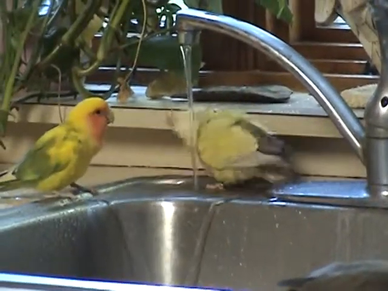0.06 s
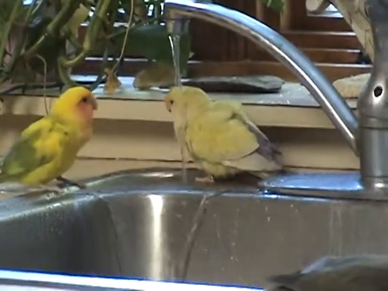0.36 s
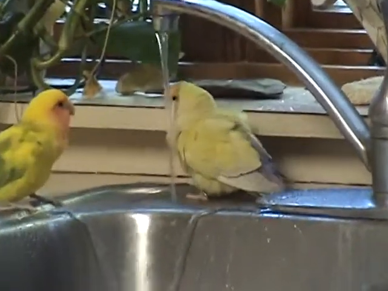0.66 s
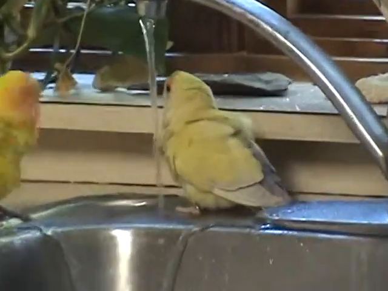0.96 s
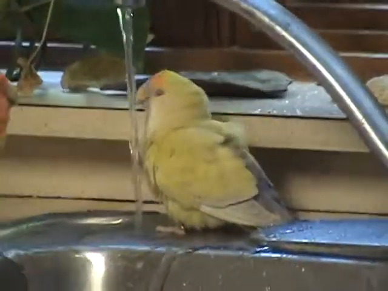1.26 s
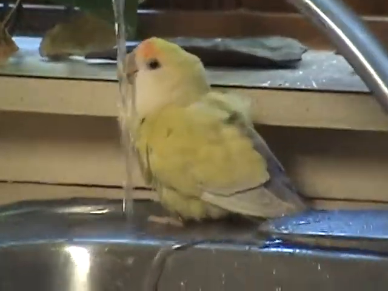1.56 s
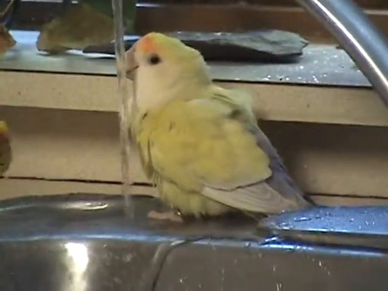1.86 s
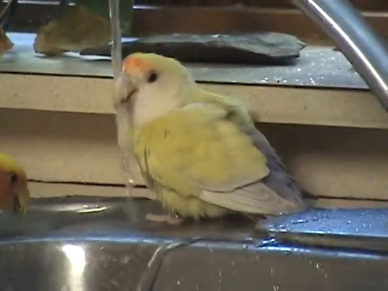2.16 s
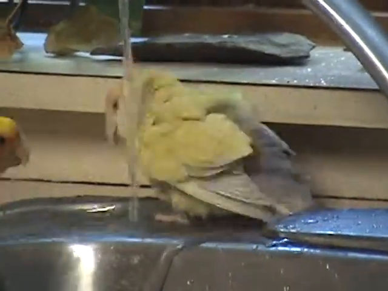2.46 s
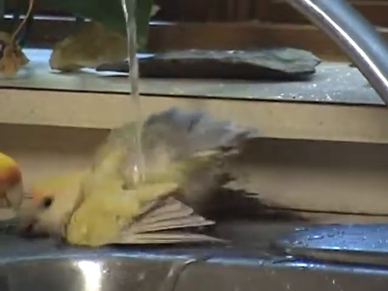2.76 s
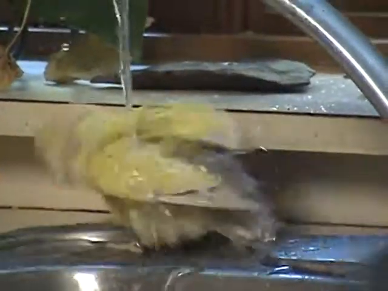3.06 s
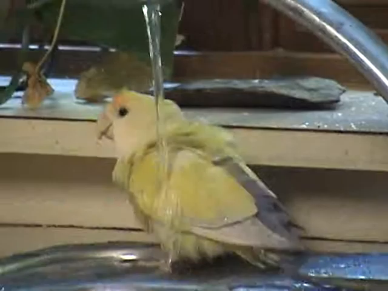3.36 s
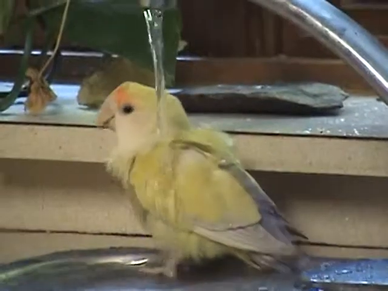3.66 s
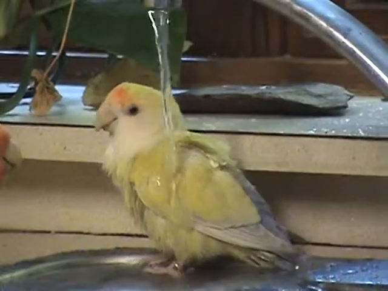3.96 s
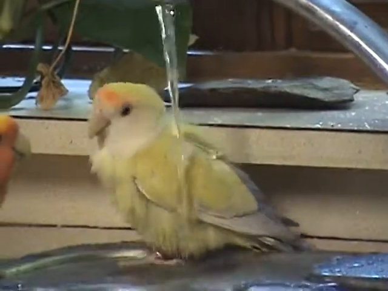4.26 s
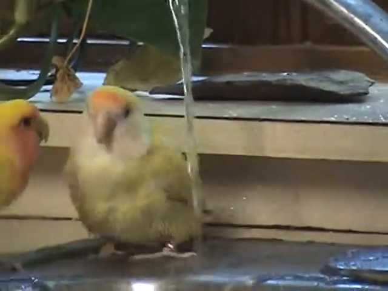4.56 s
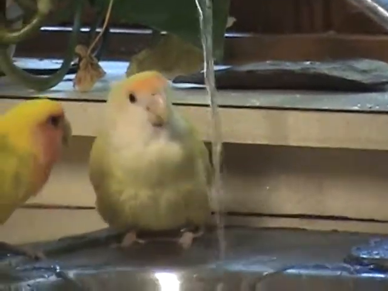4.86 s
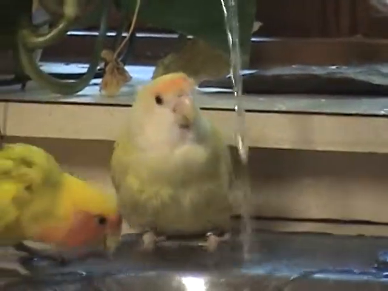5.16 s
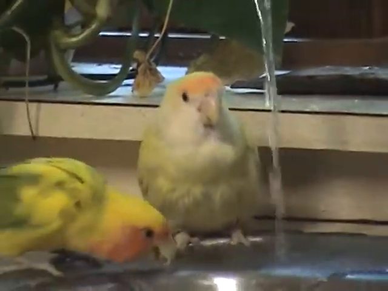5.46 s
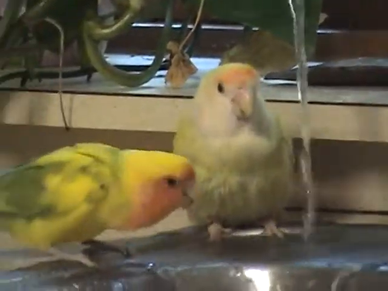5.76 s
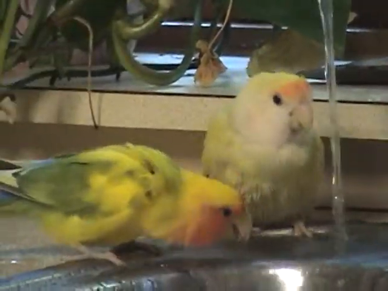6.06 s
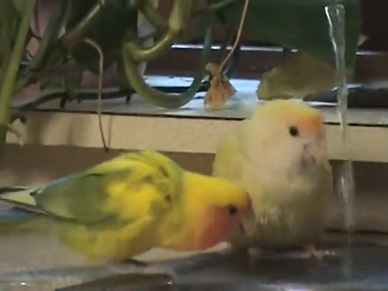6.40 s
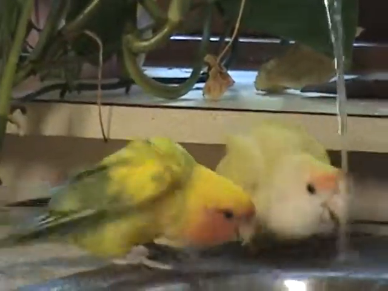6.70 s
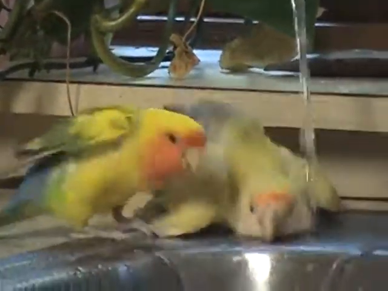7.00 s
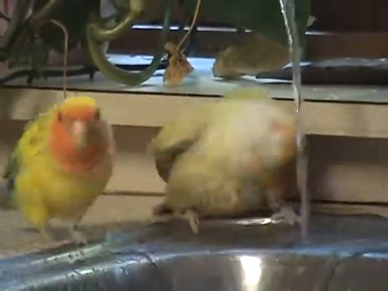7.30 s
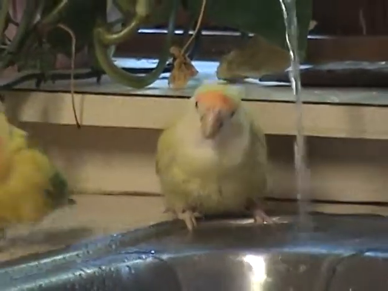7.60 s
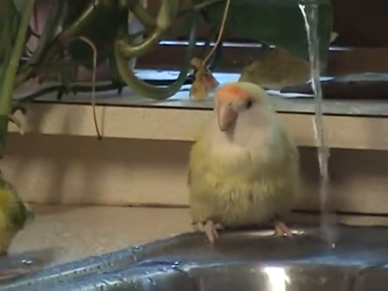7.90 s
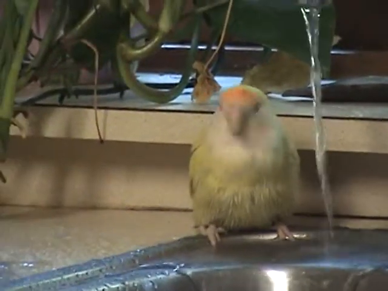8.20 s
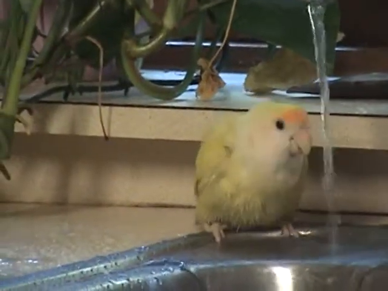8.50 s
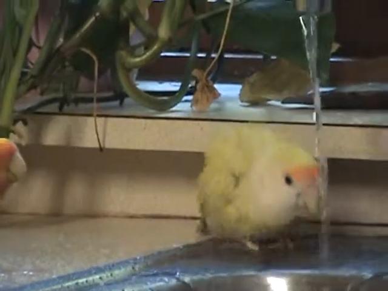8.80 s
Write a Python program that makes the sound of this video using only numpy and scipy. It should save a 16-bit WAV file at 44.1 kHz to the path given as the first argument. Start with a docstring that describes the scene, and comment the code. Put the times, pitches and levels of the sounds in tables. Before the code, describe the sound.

Small parrots bathe at a kitchen sink, heard from nearby. Their piercing, raspy squawks come from the left in quick clusters with a short room echo: three early on, then a pause of about four seconds, then a last one. Much quieter, the tap water spatters throughout with a thin whistle over a low hum, joined by bouts of wet feather shaking, light ticks and tiny claw scrapes on metal.

```python
"""Lovebirds squawk on the left as they bathe under a kitchen tap. Each squawk is a quick run of
buzzes, shrieks and pips from the bird's voice organ; it rings through the room and pushes the
recorder's gain down. Wet wings flutter and throw drops, and beaks, drops and claws tick and scrape
on the steel sink. Behind them a thin stream patters, the valve whistles and a motor hums."""
import sys
import numpy as np
from scipy import signal
from scipy.fft import rfft, irfft, next_fast_len
from scipy.io import wavfile
from scipy.ndimage import uniform_filter1d

SR = 44100
rng = np.random.default_rng(int(sys.argv[2]) if len(sys.argv) > 2 else 0)


def waveform_to_disk(signal):
    """Save audio, clipped to [-1, 1], as 16-bit WAV at the path in sys.argv[1]."""
    frames = np.transpose(np.atleast_2d(signal))
    scaled = np.clip(frames, -1, 1) * 32767
    samples = np.round(scaled).astype(np.int16)
    wavfile.write(sys.argv[1], SR, samples)


N = 394254
TIME = np.arange(N) / SR


def from_db(db):
    """Turn decibels into a number to multiply by."""
    return 10 ** (np.asarray(db) / 20)


def unit_power(x):
    """Scale a signal so that its average power is 1."""
    return x / np.sqrt(np.mean(x ** 2) + 1e-20)


def at_hz(points, hz):
    """Read between the rows of a (frequency, value) table, giving each octave equal room."""
    freqs, values = np.transpose(points)
    return np.interp(np.log(hz), np.log(freqs), values)


def drift(rate_hz, size=N):
    """A smooth random wobble, typically about 1 away from zero."""
    knots = rng.standard_normal(size // 8 + 4)
    position = np.arange(size) * min(2 * rate_hz / SR, 1 / 8)
    return np.interp(position, np.arange(len(knots)), knots) * np.sqrt(3 / 2)


def envelope(t, length, attack_s, release_s):
    """Fade in from t = 0, hold until length, then fade out."""
    return np.clip(t / attack_s, 0, 1) * np.clip(1 + (length - t) / release_s, 0, 1)


def pan(lean_db):
    """Left and right gains; a positive lean makes the left side louder."""
    gains = from_db(np.array([lean_db, -lean_db]).reshape(2, -1) / 2)
    return gains / gains.mean(axis=0)


def pair(mid, side, alike):
    """Mix two unrelated signals into left and right, from unrelated (0) to the same (1)."""
    alike = np.clip(alike, 0, 1)
    return mid + np.sqrt((1 - alike) / (1 + alike)) * side * [[1], [-1]]


def bands(size=N):
    """Give the centre frequency and two unrelated noises for each band, from bass to treble."""
    edges_hz = np.geomspace(22, 17000, 23)
    white = rng.standard_normal((2, 2, size))
    for k, (low, high) in enumerate(zip(edges_hz, edges_hz[1:])):
        band = signal.butter(2, [low, high], "band", fs=SR, output="sos")
        yield np.sqrt(low * high), signal.sosfilt(band, white[k % 2])


def resonate(x, hz, width):
    """A resonance lets through the sound near one frequency and weakens the rest."""
    r = np.exp(-np.pi * width / SR)
    feedback = [1, -2 * r * np.cos(2 * np.pi * hz / SR), r * r]
    return signal.lfilter(np.array([1, 0, -1]) * (1 - r * r) / 2, feedback, x + 1e-18)


def ring(clicks, hz, fade_s):
    """Each click starts a pure tone that dies away by 60 dB in fade_s."""
    r, step = from_db(-60 / (fade_s * SR)), 2 * np.pi * hz / SR
    return signal.lfilter([0, np.sin(step)], [1, -2 * r * np.cos(step), r * r], clicks + 1e-18)


def sink_noise(spectrum, flicker_db, flicker_hz):
    """Stereo rushing noise from the sink, each band flickering on its own."""
    # where the noise sits: (frequency [Hz], left over right [dB])
    lean = [(60, 3), (130, -8), (290, 6), (640, 4), (1410, 9), (3100, 20.5), (6820, 10.5), (15000, 4)]
    # how alike the two sides are: (frequency [Hz], likeness [0-1])
    likeness = [(30, 0.99), (150, 0.69), (500, 0.17), (1500, 0.48), (5000, 0.35), (15000, 0.45)]
    out = 0
    for hz, noise in bands():
        gain = from_db(at_hz(spectrum, hz) + flicker_db * drift(flicker_hz))
        out += gain * pan(at_hz(lean, hz)) * pair(*noise, at_hz(likeness, hz))
    return unit_power(out)


def spray(per_s, cycles=1.8):
    """Droplets of mixed sizes burst at random, each ringing very briefly at one of 16 pitches."""
    sizes = from_db(-2.0 * np.minimum(rng.exponential(1, N), 4))
    clicks = sizes * rng.choice([-1, 1], N) * (rng.random(N) < per_s / SR)
    pitches, choice = np.geomspace(2500, 12000, 16), rng.integers(0, 16, N)
    return unit_power(sum(ring(clicks * (choice == k), hz, cycles / hz) for k, hz in enumerate(pitches)))


def kitchen(x, echo_db, alike, build_s):
    """Add dense echoes from the walls, which build up and then die faster in the treble."""
    # how long the room rings: (frequency [Hz], time to fade by 60 dB [s])
    ring_times = [(300, 0.67), (2000, 0.45), (3700, 0.44), (6500, 0.48), (15000, 0.31)]
    t = TIME[:SR * 3 // 4]
    tail = sum(pair(*noise, alike) * 1000 ** (-t / at_hz(ring_times, hz)) for hz, noise in bands(len(t)))
    tail *= 1 - np.exp(-(t / build_s) ** 2)
    tail /= np.sqrt(np.sum(tail ** 2) / 2)
    return x + from_db(echo_db) * signal.fftconvolve(x, tail, axes=1)[:, :N]


def microphones(x):
    """The two microphone openings hear each frequency slightly out of step."""
    # how far the left side is ahead: (frequency [Hz], phase lead [radians])
    left_lead = [(200, 0.75), (700, 1.1), (1400, 2.1), (3000, 0.091), (5500, -0.0072), (9000, -0.88),
                 (14000, 0)]
    size = next_fast_len(N + SR // 10, real=True)
    lead = at_hz(left_lead, np.linspace(1, SR / 2, size // 2 + 1))
    return irfft(rfft(x, size) * np.exp(0.5j * lead * np.array([[1], [-1]])), size)[:, :N]


def motor_hum():
    """A motor hums somewhere in the kitchen, wavering slightly in pitch and level."""
    # the motor's tones: (frequency [Hz], level [dB])
    tones = [(188.4, -51.5), (565.2, -58.5)]
    speed = 1 + 0.00536 * drift(7.3)
    clock = np.cumsum(speed) / SR
    return sum(from_db(db + 0.23 * drift(5.1)) * np.sqrt(2) * np.sin(2 * np.pi * hz * clock)
               for hz, db in tones)


def running_tap():
    """The stream drums on the basin and spatters; the flow keeps the valve whistling."""
    # tone colour of the stream: (frequency [Hz], relative level [dB])
    water_colour = [(25, -11), (60, -4.5), (130, -3), (200, -1), (340, -10.5), (480, -7), (700, -5.5),
                    (1400, -12.5), (3300, -22), (4800, -14), (6200, -22.5), (9000, -17.5), (12500, -45),
                    (16000, -17.5)]
    # ringing notes of the steel basin: (frequency [Hz], width [Hz], level [dB])
    basin_notes = [(236.4, 9.6, -55.5), (266.7, 3.5, -58), (300, 9.9, -59.5), (342.3, 25, -53),
                   (386, 40, -58.5), (600, 83, -67.5)]
    # whistles of the valve: (frequency [Hz], base width [Hz], level [dB])
    whistles = [(2905, 66, -71), (4510, 8.2, -62.5), (5561, 94, -42.5), (5370, 210, -54), (6110, 12, -62),
                (10340, 180, -65), (15020, 90, -86)]
    stream = from_db(-46.0) * sink_noise(water_colour, flicker_db=2.0, flicker_hz=16)
    basin = valve = 0
    for hz, width, db in basin_notes:
        drumming = pair(*rng.standard_normal((2, N)), alike=0.75)
        basin += from_db(db) * unit_power(resonate(drumming, hz, width))
    spatter = from_db(-56.5 + 0.86 * drift(5)) * spray(per_s=900) * pan(2.2)
    for hz, width, db in whistles:
        flow = pair(*rng.standard_normal((2, N)), alike=0.42)
        whistle = resonate(resonate(flow, hz, 1.4 * width), hz, 1.4 * width)
        valve += from_db(db) * unit_power(whistle)
    return stream + basin + spatter + valve * pan(9.1)


def claw_scrapes(fade_s=0.0026):
    """A sliding claw rubs the steel rim, which barely rings."""
    # each slide of a claw: (time [s], length [s], level [dB])
    slides = [(2.848, 0.0025, -37), (5.294, 0.017, -38.5), (8.488, 0.011, -43)]
    # resonances of the rim: (frequency [Hz], base width [Hz], relative gain [dB])
    rim_notes = [(2370, 2200, -2), (2850, 210, 2), (3140, 360, 3), (3900, 760, -22)]
    pressure = sum(from_db(db) * (TIME > s) * np.exp(-np.clip((TIME - s - length) / fade_s, 0, 20))
                   for s, length, db in slides)
    friction = rng.standard_normal(N) * from_db(3.1 * drift(300))
    rim = sum(from_db(db) * resonate(resonate(friction, hz, width), hz, 2 * width)
              for hz, width, db in rim_notes)
    return pressure * unit_power(rim)


def steel_ticks(bright_hz=6000, crack_db=15, fade_s=0.004):
    """Drops and beaks hit the steel: a crack and a brief splatter, each with its own brightness."""
    # each hit: (time [s], level [dB], treble boost at bright_hz [dB])
    hits = [(1.0524, -37.5, 12), (2.6367, -36.5, -6), (2.8514, -28, 2.5), (3.0132, -44, 3),
            (3.175, -39.5, 7.5), (4.677, -47, 5), (4.7284, -39, 1), (5.3297, -33, 3), (5.5087, -39.5, 7),
            (5.7737, -35.5, 1.5), (6.45, -39.5, 2), (6.5676, -40.5, 5), (6.747, -50, 10), (6.8906, -46, 8),
            (7.262, -37, 7), (7.4487, -34.5, 7), (8.525, -38.5, 9), (8.7241, -35.5, 4.5)]
    # tone colour of a hit: (frequency [Hz], relative level [dB])
    hit_colour = [(300, -17), (900, 8.5), (2000, 5), (3200, 1.5), (5000, 6.5), (8000, 1), (12000, -9.5),
                  (16000, -39)]
    t, out = TIME[:SR // 16], np.zeros(N + SR)
    hz = np.linspace(1, SR / 2, len(t) // 2 + 1)
    crack = from_db(crack_db) * (np.arange(len(t)) == 24)   # a one-sample spike
    for s, level_db, treble_db in hits:
        colour = unit_power(from_db(at_hz(hit_colour, hz) + treble_db * np.minimum(hz / bright_hz, 2)))
        splatter = rng.standard_normal(len(t)) * np.exp(-t / fade_s)
        tick = irfft(rfft(crack + splatter) * colour, len(t))
        out[int(s * SR):int(s * SR) + len(t)] += from_db(level_db) * tick
    return out[:N]


def wet_wings(wingbeat_hz=28, slap_s=0.027):
    """Each wingbeat swishes wet feathers and flings off droplets; single strokes slap."""
    # bouts of wing shaking: (time [s], length [s], feather swish [dB], flung drops [dB])
    bouts = [(0, 0.036, -50, -48), (2.484, 0.58, -70, -58), (4.63, 0.13, -50, -57),
             (6.464, 0.43, -55.5, -56.5), (7.168, 0.57, -55, -54), (8.322, .61, -47, -51)]
    # single strokes and wet slaps: (time [s], level [dB])
    slaps = [(1.063, -41.5), (2.205, -40), (2.515, -45), (3.65, -37), (4.02, -43.5), (4.131, -38.5),
             (4.28, -45.5), (7.205, -41), (8.53, -40), (8.58, -58)]
    # tone colour of the feathers: (frequency [Hz], relative level [dB])
    wing_colour = [(80, -12), (250, -32), (700, -12), (1150, -7.5), (1700, -12.5), (4000, -18),
                   (15000, -55)]
    swish = drops = 0
    for s, length, swish_db, drops_db in bouts:
        shaking = envelope(TIME - s, length, attack_s=0.057, release_s=0.027)
        swish += from_db(swish_db) * shaking
        drops += from_db(drops_db) * shaking
    beat_hz = wingbeat_hz * (1 + 0.217 * drift(20))
    beat = from_db(1.9 * np.sin(2 * np.pi * np.cumsum(beat_hz) / SR))
    strokes = sum(from_db(db) * np.exp(-np.minimum(abs(TIME - s) / slap_s, 20)) for s, db in slaps)
    feathers = (swish * beat + strokes) * sink_noise(wing_colour, flicker_db=2.5, flicker_hz=33.95)
    return feathers + drops * beat * spray(per_s=1000) * pan(6.9)


def bird_note(start, length, first_hz, last_hz, level_db, rough, bright_db, others_db=0,
              lock=1, bend=1, attack_s=0.004):
    """The voice organ buzzes and rasps; it can lock on every 2nd or 3rd harmonic as the others fade."""
    # how the throat and beak colour the voice: (frequency [Hz], gain [dB])
    throat = [(1400, -14), (1800, -2), (2400, 0), (3000, 5.5), (3600, 3), (4600, 3), (5800, 3), (7200, -4),
              (8500, -9.5), (10000, -13.5), (12000, -26), (13400, -21.5), (14500, -66)]
    first, size = int(max(start, 0) * SR), SR // 6
    t = TIME[:size]
    along = np.clip(t / length, 0, 1)
    low, high = sorted((first_hz, last_hz))
    pitch = low + (high - low) * (along if last_hz > first_hz else 1 - along) ** bend
    effort_db = 25.5 * np.log2(pitch / high)   # loudest where the pitch is highest
    pitch *= 1 + 0.0467 * rough * drift(400, size) + 0.0063 * drift(151.3, size)
    phase = 2 * np.pi * np.cumsum(pitch) / SR
    phase += 0.24 * rough * drift(1000, size)   # uneven cycles fray the high harmonics most
    k = np.arange(1, 10)[:, None]   # harmonics: whole multiples of the pitch
    harmonic_db = at_hz(throat, k * pitch) + others_db * (k % lock > 0) + bright_db * np.log2(k)
    weights = from_db(harmonic_db) * (k * pitch < SR / 2)
    voice = np.sum(weights * np.sin(k * phase), axis=0) / np.sqrt(np.sum(weights ** 2, axis=0) / 2)
    rasp = 1 + 0.48 * rough * np.tanh(drift(900, size))
    loudness = envelope(t, length, attack_s, release_s=0.0033) * from_db(level_db + effort_db)
    out = np.zeros(N)
    out[first:first + size] = voice * rasp * loudness
    return out


def squawks():
    """The birds jump between three kinds of note; so small a beak sends out no bass."""
    # buzzes swell and glide straight, with all harmonics: (time [s], length [s], first pitch [Hz],
    # last pitch [Hz], level at the top pitch [dB], roughness [0-1], brightness [dB per octave])
    buzz_notes = [(.005, 0.018, 1910, 2260, -9, 0.42, 6), (0.095, 0.015, 2190, 2050, -14.5, 0.4, 6.5),
                  (0.207, 0.066, 1794, 1802, -19.5, 0.14, -1.5),
                  (0.29, 0.015, 1710, 1895, -9.5, 0.83, -0.5), (1.884, 0.023, 1755, 2256, -7, 0.54, 5),
                  (2.134, 0.022, 1777, 1687, -12.5, 0.05, 4.5),
                  (2.146, 0.038, 2020, 1849, -13.5, 0.84, 4.5), (3.39, .022, 1894, 2470, -7.5, 0.42, 6),
                  (3.59, 0.0362, 1800, 2088, -15, 0.54, 2), (3.771, 0.0384, 1647, 1480, -20, 0.33, -2.5),
                  (8.04, 0.055, 1710, 1786, -23.5, 0.26, -1)]
    # shrieks jump an octave as the odd harmonics fade: (the buzz columns, odd harmonics [dB])
    shriek_notes = [(0, 0.0073, 1751, 1775, -8.5, 0.2, 1, -14),
                    (0.028, 0.068, 2760, 1747, -9, 0.88, 1, -13),
                    (0.077, 0.12, 1977, 1986, -18.5, 0.6, 2, -15.5),
                    (.303, 0.068, 2458, 1986, -11.5, 0.82, 3.5, -8),
                    (0.38, 0.034, 1983, 1797, -12.5, 0.71, 3.5, -17),
                    (2.194, 0.04, 1717, 1904, -14.5, 0.1, 3, -20),
                    (2.242, 0.038, 1958, 1892, -15.5, 0.3, 3.5, -15.5),
                    (3.416, 0.027, 2312, 1730, -7.5, 0.13, -10, -46),
                    (3.438, 0.029, 1687, 1673, -14.5, 0, -12.5, -29.5),
                    (3.49, 0.036, 2290, 2208, -8, 0.17, 0.5, -59),
                    (3.626, 0.02, 1915, 1790, -14, 0.37, 2.5, -30),
                    (3.661, 0.031, 1946, 2022, -12.5, 0.25, 6.5, -27),
                    (3.811, 0.019, 1690, 1890, -11.5, 0, 3, -21),
                    (3.826, 0.069, 1888, 1840, -19.5, 0.45, 2.5, -12.5),
                    (7.697, 0.03, 1767, 1761, -21, 0.25, 4, -28),
                    (7.721, 0.019, 1810, 2353, -8.5, 0.4, 7, -35),
                    (7.757, 0.0177, 1847, 1374, -12.5, 0.5, 0, -42),
                    (7.775, 0.0361, 1542, 1398, -18.5, 0.51, -10, -48),
                    (8.108, 0.046, 1822, 2302, -8, 0.13, -0.5, -48),
                    (8.154, 0.064, 2920, 2850, -15, 0.48, -5, -60),
                    (8.242, 0.047, 2137, 1618, -10, 0.11, -1, -40)]
    # short, piercing pips lock on the third harmonic: (the first five buzz columns)
    pip_notes = [(1.916, 0.028, 2242, 2077, -12), (2.246, 0.015, 2010, 1902, -10.5),
                 (3.478, 0.017, 2000, 2035, -14.5), (3.683, 0.0262, 2050, 1710, -9),
                 (3.819, 0.0196, 2020, 1786, -10)]
    # the birds sit well to the left: (frequency [Hz], left over right [dB])
    bird_lean = [(1800, 13.5), (3500, 12), (6000, 9.5), (9000, 7.5), (13000, 5)]
    rise_bend, fall_bend = 2.9, 2.1   # a shriek stays near its low pitch: it rises late or drops early
    buzzes = sum(bird_note(*row, attack_s=0.009) for row in buzz_notes)
    shrieks = 0
    for s, length, first_hz, last_hz, *tone in shriek_notes:
        bend = rise_bend if last_hz > first_hz else fall_bend
        shrieks += bird_note(s, length, first_hz, last_hz, *tone, lock=2, bend=bend)
    pips = sum(bird_note(*row, rough=0.12, bright_db=0.5, others_db=-26, lock=3) for row in pip_notes)
    bass_cut = signal.butter(8, 1500, "high", fs=SR, output="sos")
    voice = signal.sosfilt(bass_cut, buzzes + shrieks + pips + 1e-18)
    size = next_fast_len(N, real=True)
    lean_db = at_hz(bird_lean, np.linspace(1, SR / 2, size // 2 + 1))
    return irfft(rfft(voice, size) * pan(lean_db), size)[:, :N]


def scene():
    """Squawks, ticks and scrapes ring in the room over the tap, the wings and the motor."""
    calls = kitchen(squawks(), echo_db=-1.0, alike=0.55, build_s=0.0032)
    contacts = (steel_ticks() + claw_scrapes()) * pan(9.5)
    contacts = kitchen(contacts, echo_db=5.5, alike=0.38, build_s=0.00083)
    return microphones(calls + contacts + running_tap() + wet_wings() + motor_hum() * pan(-0.82))


def record(dry, threshold_db=-17, squeeze=0.39, release_db_per_s=12, ceiling=0.81, cutoff_hz=15800):
    """The gain drops on loud calls and recovers slowly; peaks are rounded and the top treble is cut."""
    power = uniform_filter1d(np.mean(dry ** 2, axis=0), size=400)
    level_db = 10 * np.log10(np.abs(power) + 1e-12)
    cut_db = np.maximum(level_db - threshold_db, 0) * squeeze
    held_db = np.maximum.accumulate(cut_db + release_db_per_s * TIME) - release_db_per_s * TIME
    out = dry * from_db(-uniform_filter1d(held_db, size=200))
    # a slightly lopsided microphone turns sudden loudness into a soft low thump
    out += 0.067 * signal.sosfilt(signal.butter(1, [30, 120], "band", fs=SR, output="sos"), out ** 2)
    rounded = out / (1 + (out / ceiling) ** 4) ** (1 / 4)
    return signal.sosfilt(signal.ellip(10, 0.1, 80, cutoff_hz, fs=SR, output="sos"), rounded)


dry = scene()
out = record(dry)
waveform_to_disk(out)
```